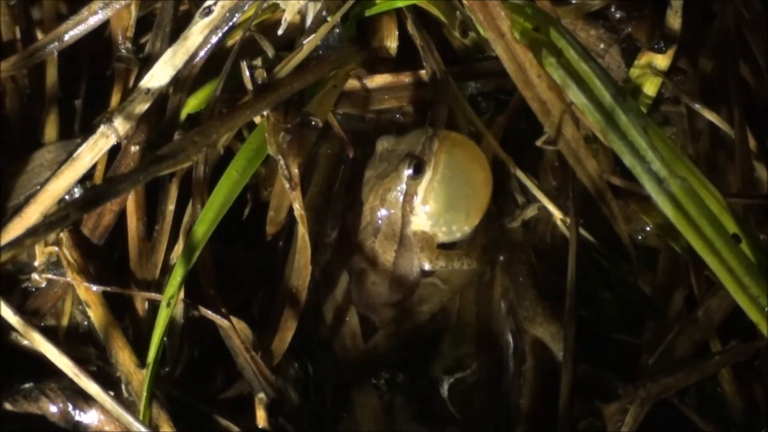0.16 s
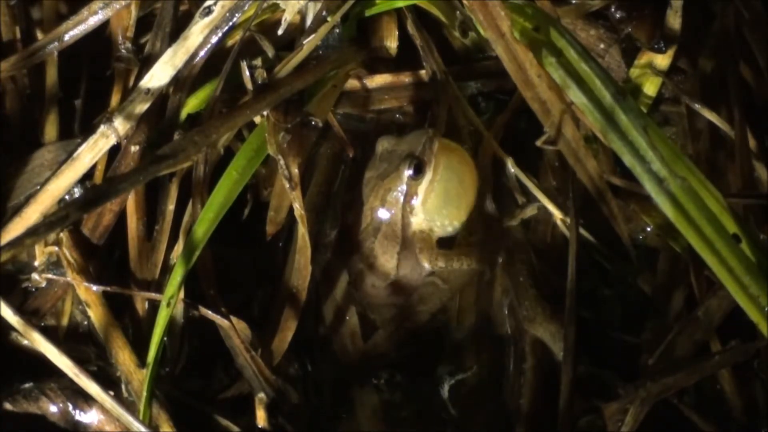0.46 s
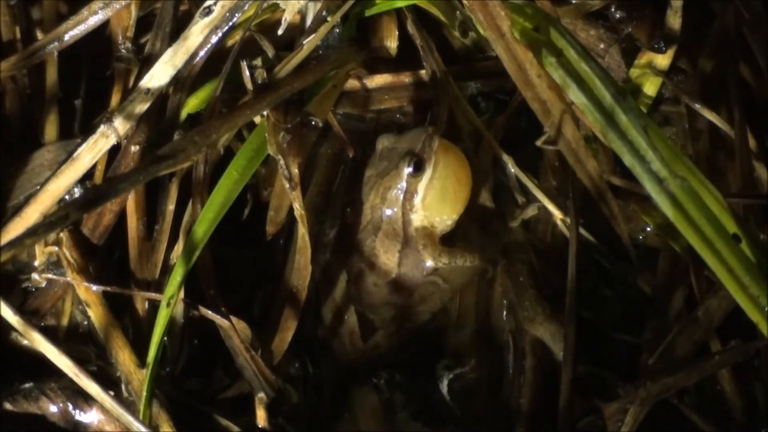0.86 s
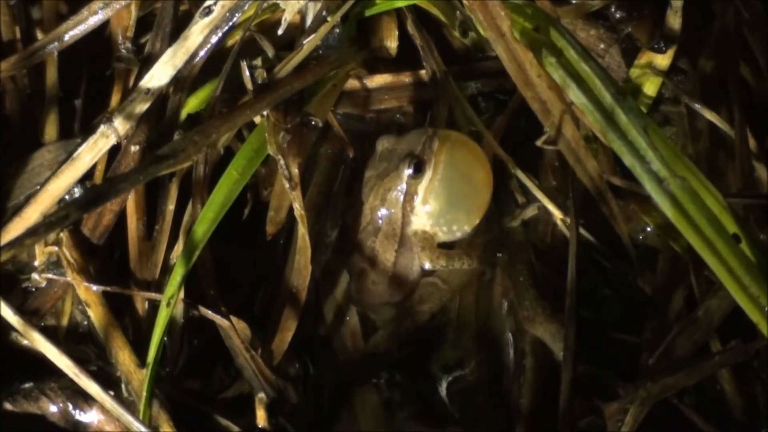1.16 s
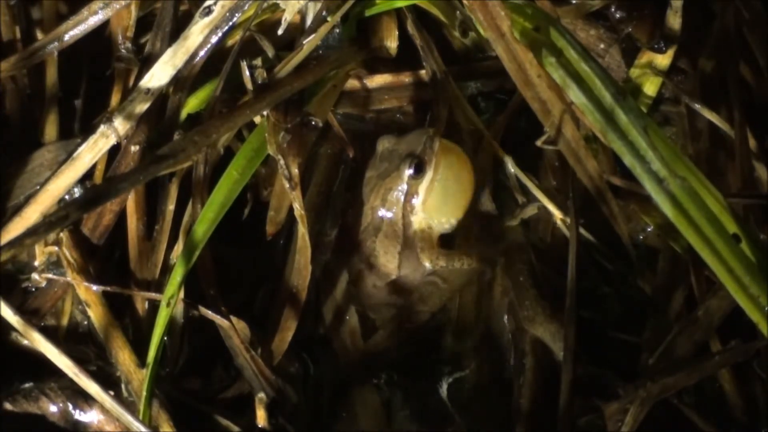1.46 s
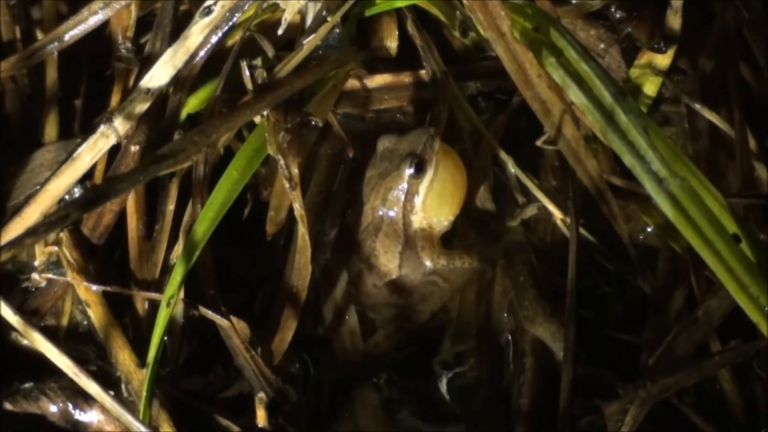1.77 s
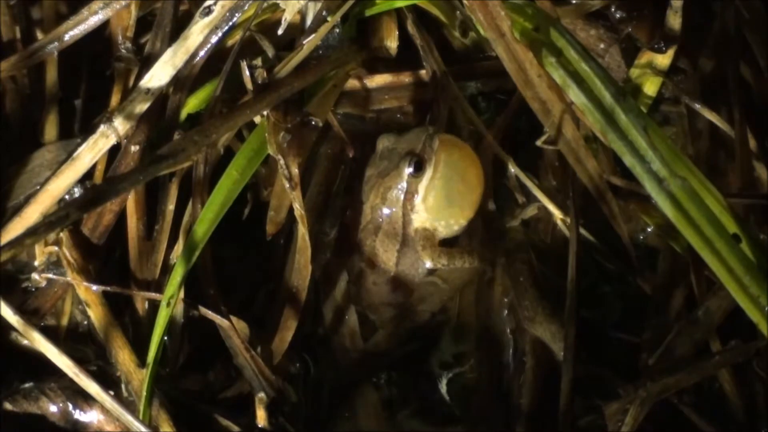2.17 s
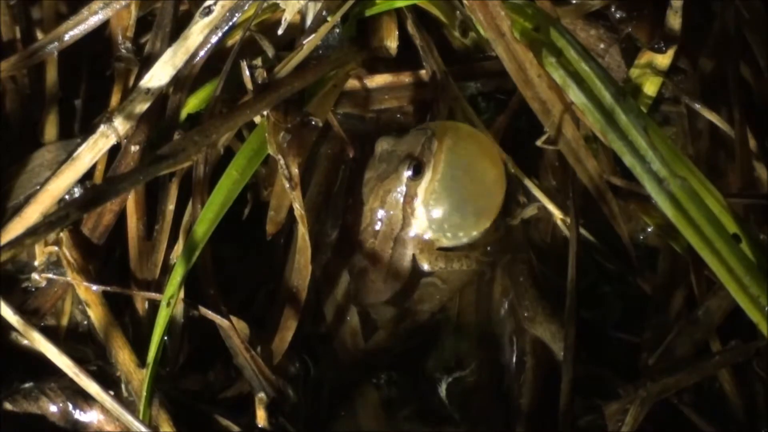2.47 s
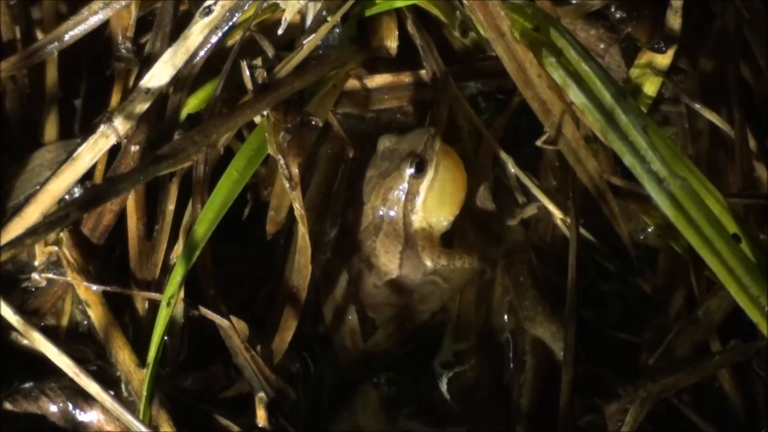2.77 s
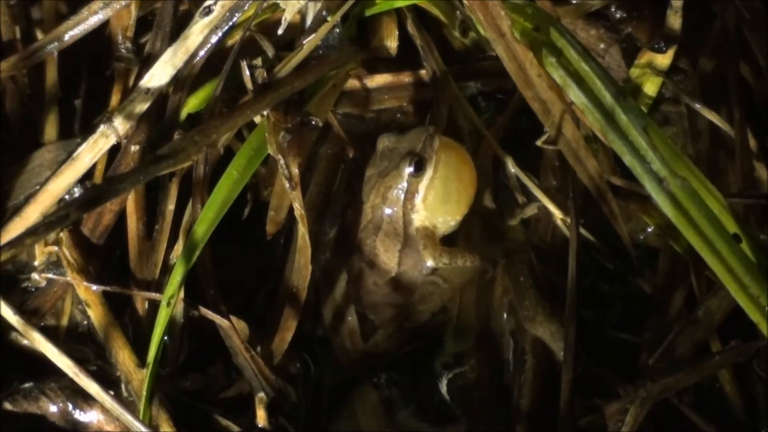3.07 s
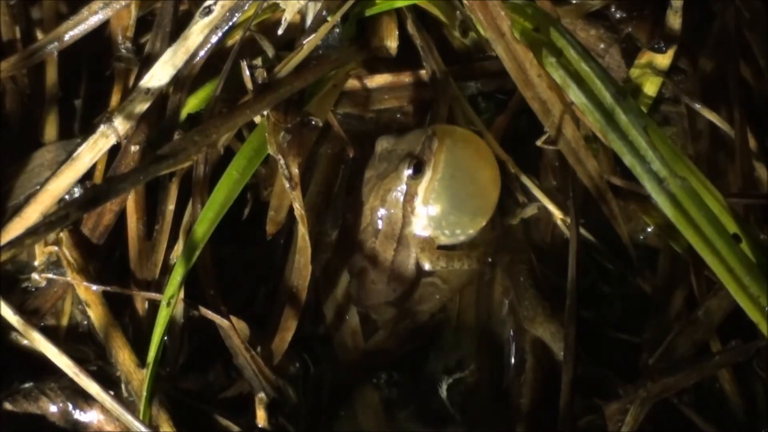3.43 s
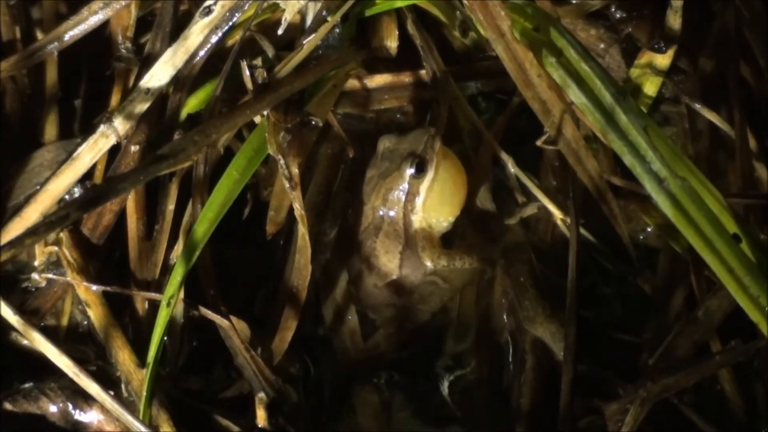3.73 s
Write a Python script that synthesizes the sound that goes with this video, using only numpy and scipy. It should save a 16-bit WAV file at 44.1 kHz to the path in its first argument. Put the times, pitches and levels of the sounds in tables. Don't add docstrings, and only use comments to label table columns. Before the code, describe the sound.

Close frog creaks, ratchet-like clicks rising and slowing, over a wet marsh full of high peeps

```python
import sys
import numpy as np
from scipy import signal
from scipy.fft import rfft, irfft
from scipy.io import wavfile
from scipy.ndimage import uniform_filter1d, minimum_filter1d

SR = 44100
rng = np.random.default_rng(int(sys.argv[2]) if len(sys.argv) > 2 else 0)


def output_pcm(signal):
    pcm = np.clip(np.atleast_2d(signal).T, -1, 1) * 32767
    wavfile.write(sys.argv[1], SR, np.round(pcm).astype(np.int16))


def makeup_ratio(level_db):
    decades = np.asarray(level_db, float) / 20
    return 10 ** decades


N = 171990


def evened(x):
    return x / np.sqrt(np.mean(x ** 2) + 1e-20)


def read(points, hz):
    f, value = np.transpose(points)
    return np.interp(np.log(hz + 1), np.log(f + 1), value)


def add(mix, start_s, sound):
    if start_s >= 0:
        part = mix[..., round(start_s * SR):][..., :sound.shape[-1]]
        part += sound[..., :part.shape[-1]]


# (frequency [Hz], level [dB])
SIDE_SPECTRUM = [(25, -22), (80, -33), (170, -28), (350, -20), (700, -17.5), (4500, -10), (16000, -9)]


def noise(spectrum, level_db, patchy_db):
    frames, hz = N // 256 + 5, np.fft.rfftfreq(1024, 1 / SR)
    a, b, c, d, patches = rng.standard_normal((frames, 513, 5)).T
    patches = uniform_filter1d(patches, 8, 0)
    patches = evened(uniform_filter1d(patches, 14, 1))
    mid = a + 1j * b
    side = makeup_ratio(read(SIDE_SPECTRUM, hz))[:, None] * (c + 1j * d)
    colour = makeup_ratio(read(spectrum, hz)[:, None] + patchy_db * patches)
    z = np.array([mid + side, mid - side]) * colour
    sound = signal.istft(z, nperseg=1024, noverlap=768)[1][:, :N]
    return makeup_ratio(level_db) * evened(sound)


# (frequency [Hz], density [dB per Hz])
MARSH_SPECTRUM = [(15, -52.5), (28, -15.5), (64, 1.5), (197, 3), (334, -6), (812, -4), (1330, -12),
                  (1850, -12), (2300, -29.5), (2990, -64.5), (5060, -120)]
# (frequency [Hz], density [dB per Hz])
HISS_SPECTRUM = [(2000, -24.5), (2800, 11), (3600, -4.5), (5500, -14), (8000, -12.5), (12000, -18),
                 (15800, -16), (16400, -69.5)]
# (time [s], level [dB])
MARSH_SWELL = [(0, -2.5), (0.698, 0.5), (1.302, 0.5), (1.801, 3.5), (2.402, 2), (2.802, -2), (3.4, 2),
               (3.9, 2.5)]


def marsh():
    swell = makeup_ratio(np.interp(np.arange(N) / SR, *np.transpose(MARSH_SWELL)))
    low = swell * noise(MARSH_SPECTRUM, -35, patchy_db=1.5)
    return low + noise(HISS_SPECTRUM, -43.5, patchy_db=-0.5)


def reeds(x, t60_s, wet_db, gap_s):
    t = np.arange(SR // 2) / SR
    taps = rng.choice([-1., 1.], (2, len(t))) * (rng.random((2, len(t))) < .06)
    taps = taps * makeup_ratio(-60 * t / t60_s) * (t > gap_s)
    taps = 0.45 * taps[0] + 0.79 * taps[::-1]
    taps = taps / np.linalg.norm(taps[0])
    return makeup_ratio(wet_db) * signal.fftconvolve(x * np.ones((2, 1)), taps, axes=1)[:, :N]


PARTIALS_DB = [-34, 0, -30, -42, -50]


def whistle(length_s, hz0, hz1, level_db, path):
    on_s, off_s, curl = 0.0047, 0.0064, 1.2
    main_wobble_db, overtone_wobble_db = 1.5, 2.6
    t = np.arange(0, length_s + off_s, 1 / SR)
    hz = hz0 + (hz1 - hz0) * (1 - np.maximum(1 - t / length_s, 0) ** curl)
    turn = 2 * np.pi * np.cumsum(hz) / SR
    rate_hz = rng.uniform(3.7, 48.8, (len(PARTIALS_DB), 3, 1))
    phase = rng.random((len(PARTIALS_DB), 3, 1))
    wobble = np.sin(2 * np.pi * (rate_hz * t + phase)).sum(1)
    shape = np.clip(np.minimum(t / on_s, (t[-1] - t) / off_s), 0, 1)
    out = np.zeros(len(t))
    for k, (db, w) in enumerate(zip(PARTIALS_DB, wobble)):
        if k == 1:
            gain_db = db + main_wobble_db * w + read(path, hz)
        else:
            gain_db = db + overtone_wobble_db * w
        out += makeup_ratio(gain_db) * np.sin((k + 1) / 2 * turn)
    return np.sqrt(2) * makeup_ratio(level_db) * shape * out


# (start [s], length [s], first pitch [Hz], last pitch [Hz], level [dB])
LEFT_WHISTLES = [(.055, 0.13, 2800, 2905, -20.5), (0.12, 0.09, 2853, 3150, -17.5),
                 (0.178, 0.015, 3120, 3020, -10), (.105, 0.026, 2530, 2500, -27),
                 (0.134, .11, 2526, 2736, -17), (0.188, 0.079, 2740, 2810, -28.5),
                 (0.335, 0.084, 2864, 3130, -19.5), (0.463, 0.08, 2670, 2918, -18),
                 (0.533, 0.093, 2945, 3140, -20.5), (0.63, .075, 2798, 2905, -19.5),
                 (.705, 0.087, 2951, 3066, -16.5), (0.682, 0.049, 2660, 2756, -30),
                 (.735, 0.047, 2775, 2900, -15.5), (0.89, 0.14, 2490, 2740, -16),
                 (0.999, 0.091, 2744, 2940, -15.5), (1.093, .11, 2884, 3183, -17.5),
                 (1.645, 0.11, 2800, 3045, -17.5), (1.75, 0.043, 3070, 3140, -22),
                 (1.648, .11, 2650, 2878, -19.5), (1.797, 0.061, 2776, 2915, -17),
                 (1.823, 0.054, 2740, 2807, -24), (1.86, 0.065, 2870, 2834, -23.5),
                 (1.848, 0.03, 2570, 2480, -28), (1.872, .11, 2507, 2723, -17.5),
                 (2.328, 0.11, 2665, 2956, -19.5), (2.415, 0.029, 2840, 2830, -21),
                 (2.478, 0.032, 2850, 2940, -23), (2.53, 0.083, 2750, 2824, -27),
                 (2.53, 0.065, 2840, 2930, -16.5), (2.92, 0.072, 2683, 2864, -20),
                 (3.0, 0.063, 2780, 2924, -18.5), (3.095, 0.089, 2484, 2740, -15.5),
                 (3.297, 0.047, 2684, 2850, -22), (3.475, 0.047, 2790, 2960, -16),
                 (3.515, 0.048, 2723, 2900, -15)]
# (start [s], length [s], first pitch [Hz], last pitch [Hz], level [dB])
RIGHT_WHISTLES = [(0.0, 0.049, 2874, 3063, -15.5), (0.212, 0.065, 2870, 3057, -20.5),
                  (0.3, 0.029, 2960, 3130, -22), (0.388, 0.094, 2835, 3022, -14.5),
                  (0.86, 0.062, 2980, 3050, -15.5), (.93, 0.059, 3103, 3144, -11),
                  (0.911, 0.091, 2813, 3050, -13.5), (1.259, 0.038, 2800, 2857, -18.5),
                  (1.332, 0.05, 2924, 2954, -14), (1.366, 0.052, 3007, 3025, -15),
                  (1.376, 0.031, 2840, 2873, -18.5), (1.495, 0.027, 3020, 3050, -23),
                  (1.503, 0.046, 2800, 2917, -14.5), (1.553, 0.076, 2944, 3060, -18.5),
                  (1.636, 0.08, 3036, 3226, -15), (1.915, 0.034, 2830, 2915, -13.5),
                  (1.971, 0.05, 2940, 3030, -23.5), (2.06, 0.11, 2860, 3070, -9.5),
                  (2.296, 0.14, 2930, 3176, -15), (2.61, 0.051, 2854, 2990, -18),
                  (2.689, 0.038, 2800, 2930, -14.5), (2.734, 0.044, 2910, 3020, -18.5),
                  (2.705, 0.03, 3080, 3060, -34), (2.796, 0.044, 3020, 3152, -20),
                  (2.815, 0.08, 2930, 3083, -17), (2.912, 0.047, 2984, 3040, -40),
                  (3.035, 0.052, 2930, 3060, -16.5), (3.09, 0.086, 3007, 3220, -14.5),
                  (3.121, 0.084, 2855, 3015, -21), (3.25, 0.037, 2796, 2904, -14),
                  (3.314, .08, 2880, 3150, -33), (3.365, 0.021, 2850, 2920, -20.5),
                  (3.427, 0.11, 2987, 3104, -15.5), (3.523, 0.062, 2890, 3004, -24),
                  (3.554, 0.089, 2940, 2955, -26.5), (3.648, 0.069, 2874, 3044, -11.5),
                  (3.73, 0.071, 3090, 3214, -15), (3.86, 0.085, 2825, 2900, -12.5)]
# (frequency [Hz], level [dB])
LEFT_PATH = [(2500, -5), (2650, -2.2), (2780, 4), (2860, 3), (2930, -5), (3000, 3.5), (3080, -0.5),
             (3200, 1.3)]
# (frequency [Hz], level [dB])
RIGHT_PATH = [(2780, -1), (2860, 1), (2930, -0.22), (2990, 1), (3050, 0.29), (3120, -0.81), (3190, 1),
              (3250, -0.76)]


def peepers():
    far_count, far_db, pan_db = 60, -37.5, 5
    near, far = np.zeros((2, N)), np.zeros(N)
    sides = (0.088, LEFT_WHISTLES, LEFT_PATH), (-0.12, RIGHT_WHISTLES, RIGHT_PATH)
    for side, rows, path in sides:
        pan = makeup_ratio(side * pan_db * np.array([[1], [-1]]) + np.array([[-.7], [.7]]))
        for start_s, *row in rows:
            add(near, start_s, whistle(*row, path) * pan)
    for when, a, b, c in rng.random((far_count, 4)):
        length_s = 0.0843 + 0.0881 * a
        call = whistle(length_s, 2750 + 220 * b, 2950 + 220 * b, far_db + 6 * c, RIGHT_PATH)
        add(far, when * N / SR, call)
    return near + reeds(near, 0.29, -11, .004) + reeds(far, 0.71, 0, 0.00042)


# (pitch at trill start [Hz], pitch at end [Hz])
SAC_MODES = [(1560, 1810), (3130, 3665), (1200, 1450), (4700, 5370), (6380, 6500), (7500, 7100),
             (8790, 8650), (10700, 10500), (12000, 12050), (13800, 13900)]
# (level at trill start [dB], level at end [dB], share of ring time [ratio])
SAC_STRENGTHS = [(-13.5, -17, 0.65), (3.5, 3.5, 1.21), (-16, -31, 0.92), (-21, -20.5, 1), (-28.5, -43, 1.2),
                 (-51, -39, 2.1), (-24.5, -37, 0.36), (-43.5, -45.5, 0.25), (-52, -54.5, 0.4),
                 (-41, -40, .4)]
# (frequency [Hz], level [dB])
SNAP_SPECTRUM = [(900, -33.5), (1500, 1), (2300, -5.5), (4500, 4.5), (7000, -11), (9000, -17.5),
                 (15000, -30.5), (16300, -48)]


def click(along, ring_s, level_db):
    snap_start_db, snap_end_db = -19.5, -24
    rise_s, roundness, haze_db, haze_s = 0.0015, 1.7, -10, 0.0073
    t = np.arange(1600) / SR
    rise = np.minimum(t / rise_s, 1)

    def ringing(share):
        fall = np.exp(-(np.maximum(t - rise_s, 0) / (ring_s * share)) ** roundness)
        return np.sin(np.pi / 2 * rise) ** 2 * fall

    colour = makeup_ratio(read(SNAP_SPECTRUM, np.fft.rfftfreq(len(t), 1 / SR)))
    snap = evened(irfft(rfft(rng.standard_normal(len(t))) * colour, len(t)))
    haze = makeup_ratio(haze_db) * rise * np.exp(-t / haze_s)
    snap_db = snap_start_db + (snap_end_db - snap_start_db) * along ** .5
    out = makeup_ratio(snap_db) * (ringing(0.98) + haze) * snap
    for k, ((hz0, hz1), (db0, db1, share)) in enumerate(zip(SAC_MODES, SAC_STRENGTHS)):
        main = k == 1
        hz = hz0 + (hz1 - hz0) * along ** (.8 if k else .3)
        hz *= 1 + (.002 if main else .005) * rng.standard_normal()
        uneven_db = 0.7 * rng.standard_normal() * (not main)
        mode_db = db0 + (db1 - db0) * along ** .5 + uneven_db
        out += makeup_ratio(mode_db) * ringing(share) * np.sin(2 * np.pi * hz * t)
    return makeup_ratio(level_db) * out


# (start [s], click gap [ms], clicks before slowing [count], slowing per click [ms])
TRILL_ROWS = [
    (-.0568, 22.41, 7.02, 2.63),
    (.9109, 23.62, 7.03, 2.85),
    (2.0669, 22.6, 7.09, 2.99),
    (3.0766, 23.08, 7.28, 2.9),
]
# (time [s], level [dB])
STUTTER_ROWS = [
    (.396, -1),
    (.4009, -3.5),
    (1.3631, -2),
    (1.3738, 1),
    (2.5208, -1),
    (2.5272, -3),
    (3.5444, -1),
    (3.551, -8),
]
# (time [s], level [dB])
SWALLOW_ROWS = [
    (.8962, -20),
    (2.052, -21),
    (3.0615, -17),
    (2.9955, -30),
]


def chorus_frog():
    clicks, first_late_s, first_db = 16, .0013, 4.5
    start_db, end_db = 5.5, 17
    ring_start_s, ring_top_s, ring_end_s, ring_stutter_s = .0017, .0033, .002, .0014
    out = np.zeros(N)
    for start_s, gap_ms, even, slowing_ms in TRILL_ROWS:
        for k in range(clicks):
            along, first = k / (clicks - 1), k == 0
            ring_s = np.interp(along, [0, .6, 1], [ring_start_s, ring_top_s, ring_end_s])
            wait_ms = gap_ms * k + slowing_ms / 2 * max(k - even, 0) ** 2
            level_db = start_db + (end_db - start_db) * along + first_db * first
            add(out, start_s + wait_ms / 1000 + first_late_s * first, click(along, ring_s, level_db))
    for time_s, db in STUTTER_ROWS:
        add(out, time_s, click(0.91, ring_stutter_s, end_db + db))
    for time_s, db in SWALLOW_ROWS:
        add(out, time_s, click(0, ring_start_s, start_db + db))
    right = 0.93 * out + .24 * np.roll(out, 4)
    near = np.array([out, right]) * makeup_ratio(np.array([[-.2], [.2]]))
    return near + reeds(out, 0.05, -28.5, 0.0057) + reeds(out, 0.36, -38.0, .01)


def scene():
    return marsh() + peepers() + chorus_frog()


def top_cut(x):
    return signal.sosfilt(signal.butter(12, 16460, fs=SR, output="sos"), x)


# (time [s], level [dB])
OVERALL_LEVEL = [(0, -3.5), (2.9, -3), (3.101, -5.5), (3.55, -9), (3.9, -11.5)]


def record(dry):
    limit_db, squeeze, ahead_s = -1.5, 0.88, 0.0027
    release_s, slow_release_s, slow_share = 0.013, 0.059, 0.18
    t = np.arange(N) / SR
    peak = -minimum_filter1d(-abs(dry).max(0), round(2 * ahead_s * SR))
    over_db = np.maximum(20 * np.log10(peak + 1e-9) - limit_db, 1e-3)

    def held(fall_s):
        return np.exp(np.maximum.accumulate(np.log(over_db) + t / fall_s) - t / fall_s)

    hold_db = (1 - slow_share) * held(release_s) + slow_share * held(slow_release_s)
    cut_db = squeeze * uniform_filter1d(hold_db, 40)
    out = dry * makeup_ratio(np.interp(t, *np.transpose(OVERALL_LEVEL)) - cut_db)
    return top_cut(out)


dry = scene()
out = record(dry)
output_pcm(out)
```